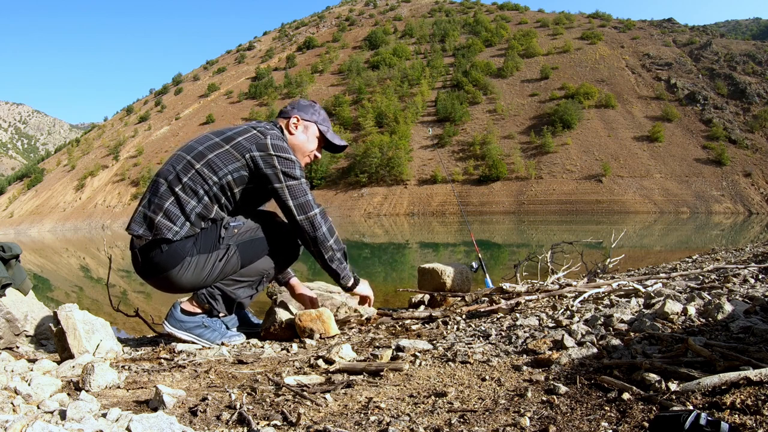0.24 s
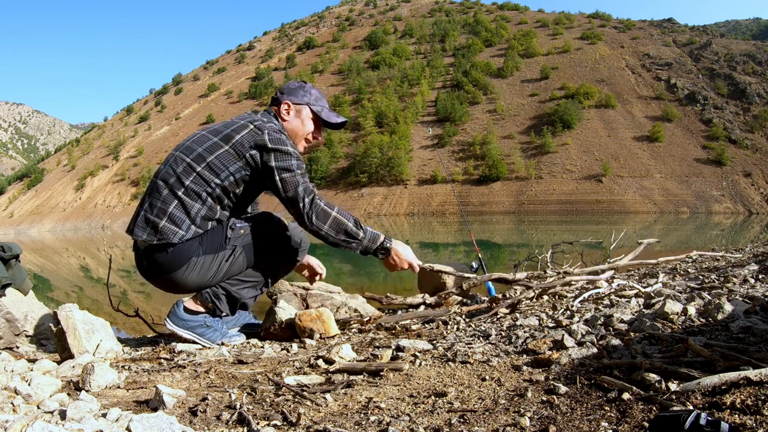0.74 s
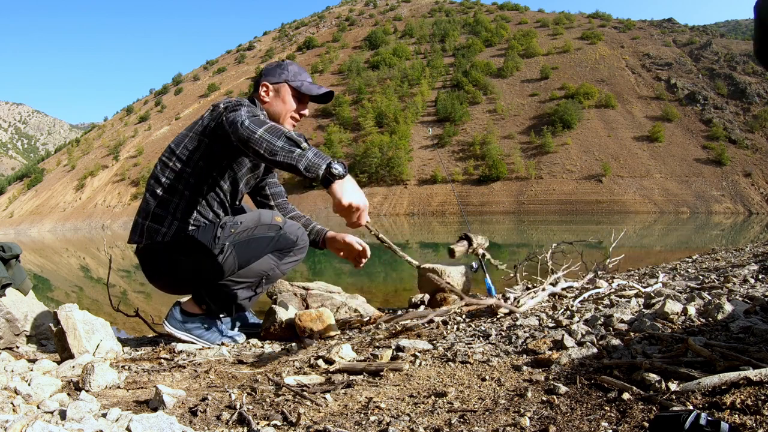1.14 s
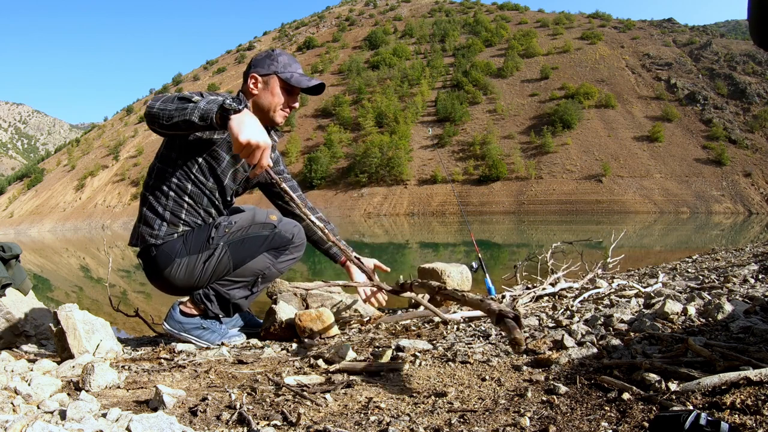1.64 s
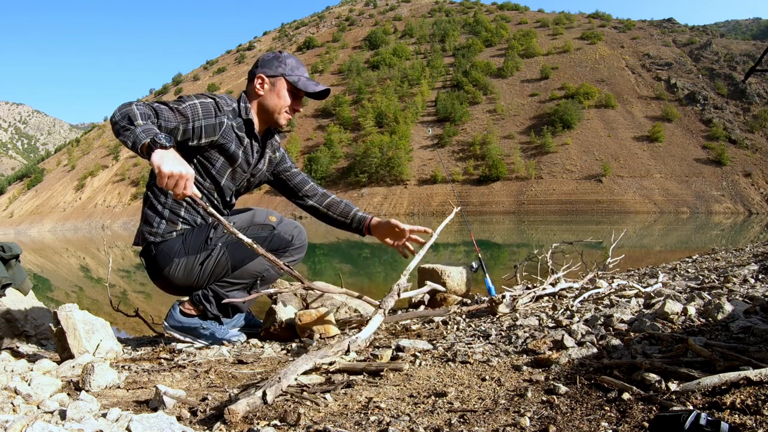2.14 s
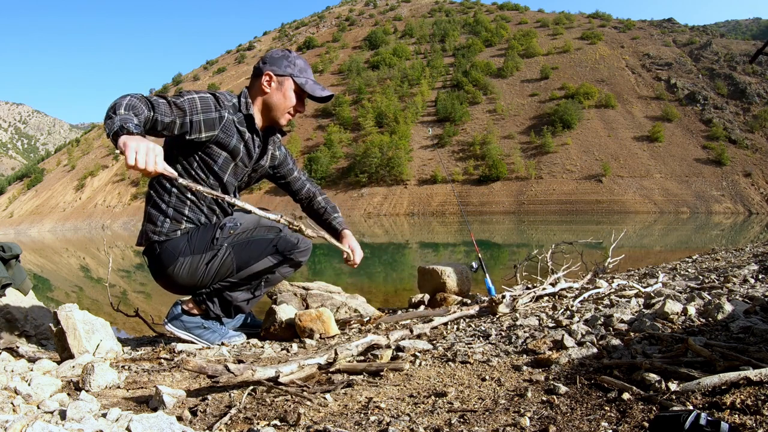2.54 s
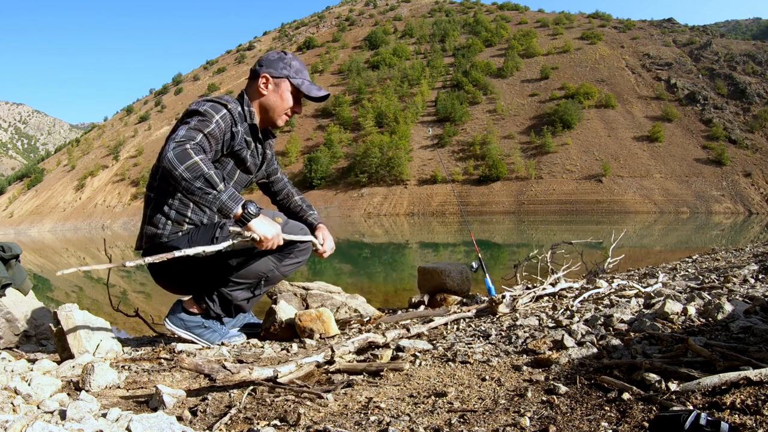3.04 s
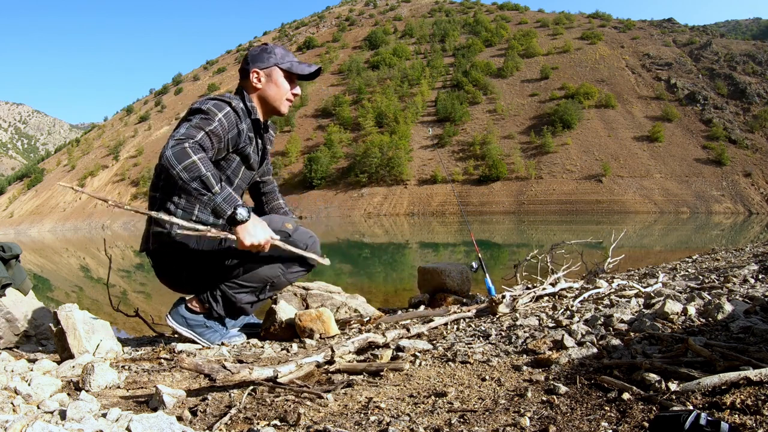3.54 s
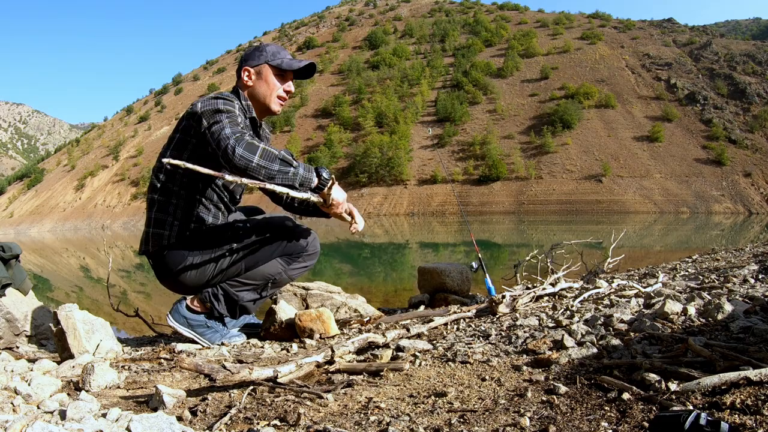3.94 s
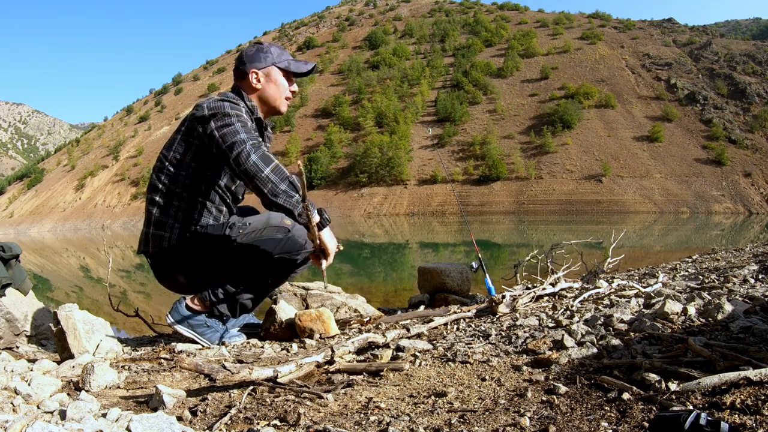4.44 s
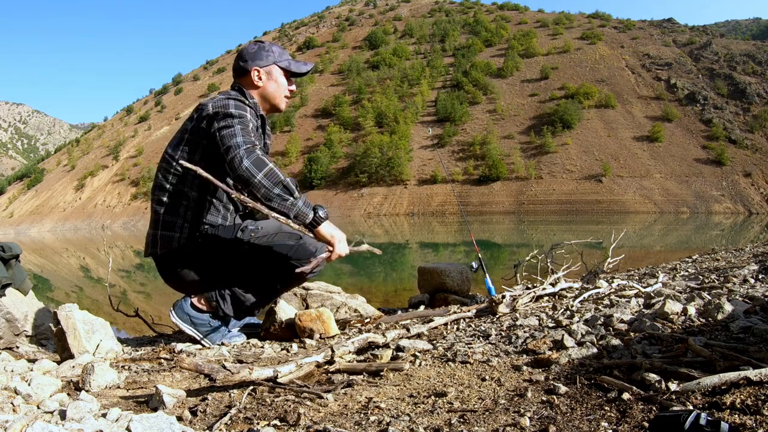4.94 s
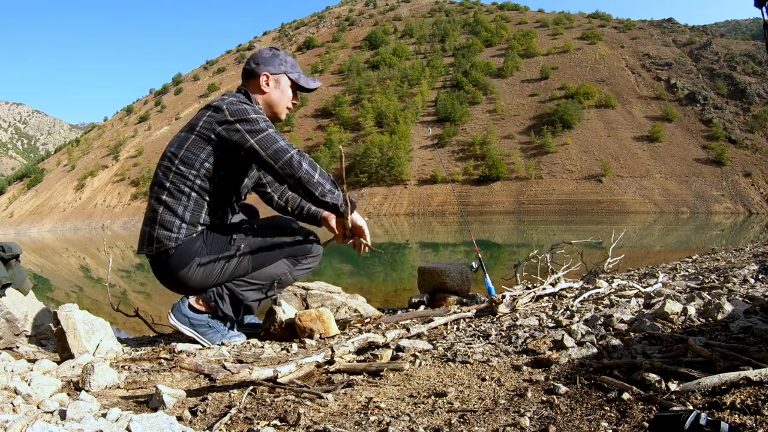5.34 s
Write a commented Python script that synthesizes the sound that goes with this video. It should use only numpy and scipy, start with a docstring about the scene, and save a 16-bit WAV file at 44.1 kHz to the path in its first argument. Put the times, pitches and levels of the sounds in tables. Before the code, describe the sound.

Brittle branches clatter and scrape across stones, rustle in the hands, and break in a few loud snaps over faint outdoor hush.

```python
"""Dry sticks are pulled from a pile, dragged over gravel and snapped by hand on a quiet stony shore.
Light knocks open the scene over a faint wash of filtered noise; dense cracking, rustle and drag follow.
The sharpest snaps come near 3.6, 3.9 and 4.8 s, each a short noise burst ringing damped modes.
A soft rising scrape of resonant friction noise follows the last of them, then handling rustle, which is
grainy noise shaped by a spectrum, as is the drag; lesser cracks continue through it."""
import sys
import numpy as np
from scipy import signal
from scipy.fft import rfft, irfft, next_fast_len
from scipy.io import wavfile
from scipy.ndimage import uniform_filter1d

SR = 44100
rng = np.random.default_rng(int(sys.argv[2]) if len(sys.argv) > 2 else 0)


def transcribe(u):
    """Save the signal u as a 16-bit wav file named by the first command-line argument.

    u: samples, shape (n,) or (channels, n), limited to [-1, 1]; the rate is SR.
    q: integer samples, one column per channel.
    """
    v = np.clip(np.atleast_2d(u).T, -1, 1)
    q = np.round(v * 32767).astype(np.int16)
    wavfile.write(sys.argv[1], SR, q)


N = 246739  # length [samples]


def gain_of(db):
    """Decibel definition: 20 dB is a tenfold amplitude."""
    return 10 ** (np.asarray(db) / 20)


def evened(x):
    """Normalisation to unit root-mean-square amplitude."""
    return x / np.sqrt(np.mean(x ** 2) + 1e-20)


def peaked(x):
    """Normalisation to a unit peak of the Hilbert envelope."""
    return x / (abs(signal.hilbert(x)).max() + 1e-12)


def read(points, hz):
    """Interpolation of a frequency table on a logarithmic frequency axis."""
    f, value = np.transpose(points)
    return np.interp(np.log(hz + 1), np.log(f + 1), value)


def follow(points, t):
    """Linear interpolation of a time table."""
    return np.interp(t, *np.transpose(points))


def add(mix, s, sound):
    """Superposition: a sound starting at s seconds sums into the mix."""
    part = mix[:, round(s * SR):][:, :sound.shape[1]]
    part += sound[:, :part.shape[1]]


def ring(x, hz, width):
    """Resonance: one damped mode of the given bandwidth [Hz], driven by x."""
    pole = np.exp((2j * np.pi * hz - np.pi * width) / SR)
    return signal.lfilter([1], [1, -pole], x).imag


# Interaural likeness of spread-out sounds: (frequency [Hz], left-right correlation [-1 to 1])
LIKENESS = [(60, -0.31), (130, -0.36), (290, 0.14), (640, -0.51), (1410, -0.66), (3100, 0.91), (6820, 0.79),
            (15000, 0.81)]
# Frequency dependence of the level difference: (frequency [Hz], share of the left-right dB [ratio])
SHADOW = [(250, 0.), (700, 0.4), (1400, 1.25), (2600, 0.77), (4500, -0.7), (9000, 1)]


def spread(x, colour, patchy_db, balance_db, size, focus=0, bright_points=((0, 0), (1, 0)), bright_scale=1):
    """Partial coherence: two coloured noises blend into a partly alike left and right, in drifting patches."""
    overlap = size * 3 // 4
    hz, t, (a, b) = signal.stft(x, SR, nperseg=size, noverlap=overlap)
    # patches are smoothed in frequency, then in time
    patches = uniform_filter1d(rng.standard_normal(a.shape), size=size // 56, axis=0)
    patches = evened(uniform_filter1d(patches, size=7200 // size, axis=1))
    same = np.clip(focus + (1 - focus) * read(LIKENESS, hz), -1, 1)[:, None]
    side = gain_of(balance_db * read(SHADOW, hz)[:, None] / 2)
    # the spectral tilt pivots at 5200 Hz
    tilt_shape = np.tanh(np.log(hz + 1) - np.log(5200))[:, None]
    tilt_db = tilt_shape * bright_scale * follow(bright_points, t)
    left = a * side
    right = (same * a + np.sqrt(1 - same ** 2) * b) / side
    colour_db = read(colour, hz)[:, None] + patchy_db * patches + tilt_db
    z = np.array([left, right]) * gain_of(colour_db)
    return evened(signal.istft(z, SR, nperseg=size, noverlap=overlap)[1][:, :N])


def grit(grain_db, grain_size):
    """Granular contact: noise strength jumps from grain to grain [samples], a few grains being large."""
    draws = np.minimum(rng.exponential(1, N // grain_size + 1), 3.5)
    sizes = gain_of(grain_db * np.repeat(draws, grain_size)[:N])
    sizes /= np.sqrt(uniform_filter1d(sizes ** 2, size=6000))  # keeps the local power steady
    return sizes * rng.standard_normal((2, N))


# Spectrum of the background wash: (frequency [Hz], relative spectral level [dB])
AIR_COLOUR = [(15, -44), (25, -2.5), (87, -19), (170, -4.5), (575, -13.5), (818, -4), (1440, -15.5),
              (2050, -16.5), (2760, -24), (3620, -18.5), (3920, -22), (8140, -27), (12900, -39),
              (16000, -45)]
AIR_DB = -66  # RMS level


def air():
    """Broadband noise: the faint steady wash of the open shore and the microphone."""
    noise = rng.standard_normal((2, N))
    return gain_of(AIR_DB) * spread(noise, AIR_COLOUR, patchy_db=3.7, balance_db=-0.4, size=2048)


# Spectrum of wood on stones: (frequency [Hz], relative spectral level [dB])
DRAG_COLOUR = [(35, -81), (60, -33.5), (112, -34), (155, 3.5), (198, 0), (275, -7), (388, -3.5), (759, -3),
               (1220, -2.5), (3000, -10), (3900, -44), (6600, -120)]


def drag(gain):
    """Impact excitation: wood bumps over stones in coarse, low grains, focused and leaning to the right."""
    bumps = grit(2.82, grain_size=220)
    return gain * spread(bumps, DRAG_COLOUR, patchy_db=4.0, balance_db=-3.0, size=1024, focus=0.78)


# Spectrum of cloth and skin on bark: (frequency [Hz], relative spectral level [dB])
RUSTLE_COLOUR = [(1350, -40), (2300, -10), (2730, -9), (2960, -4), (3510, 0), (4970, -8), (6710, -1),
                 (8030, -10), (9600, -8), (11800, -20), (13700, -20), (16000, -41)]
# Treble tilt of the rustle before its 1.5-fold scaling: (time [s], tilt [dB])
RUSTLE_TILT = [(0, 2.5), (0.95, 2.5), (1.55, 3), (1.68, -6), (1.85, 3.5), (2.0, -3.5), (2.35, -3),
               (2.75, -8), (3.0, -2), (3.57, 1), (3.95, -3), (4.2, 2), (4.8, -4), (5.3, -2.5), (5.6, 0.5)]


def rustle(gain):
    """Sliding friction: cloth and skin on bark give fine hiss with small catches."""
    catches = grit(2.07, grain_size=50)
    return gain * spread(catches, RUSTLE_COLOUR, patchy_db=3.5, balance_db=-0.5, size=512,
                         bright_points=RUSTLE_TILT, bright_scale=1.5)


# Hand and branch movements, levels at mid-stroke before smoothing:
# (start [s], length [s], rustle level [dB], drag level [dB], swell from start to end [dB])
STROKES = [(0.103, 0.085, -62, -62.5, 17), (0.176, 0.12, -74.5, -66, -2), (0.561, 0.33, -63.5, -65, 15),
           (0.892, 0.036, -51.5, -55, -4), (0.953, 0.21, -58, -61.5, -0.5), (1.175, 0.09, -81, -69.5, -1),
           (1.258, 0.043, -54.5, -49, -8), (1.306, 0.089, -45.5, -47.5, -15),
           (1.398, 0.035, -48, -47.5, -12), (1.44, 0.174, -53.5, -54, -7), (1.621, 0.13, -54.5, -55, -9),
           (1.763, 0.23, -73, -65, 5), (1.944, 0.057, -46, -43.5, -3), (2.004, 0.1, -59.5, -52.5, -9),
           (2.107, 0.28, -68, -61.5, -4.5), (2.21, 0.04, -57.5, -54, -5), (2.415, 0.084, -60, -56, -24),
           (2.5, 0.096, -59.5, -59, -10), (2.613, 0.072, -61, -63, -5), (2.688, 0.05, -76, -64, -2),
           (2.749, 0.049, -64.5, -75.5, -2), (2.877, 0.139, -95, -67, 11), (2.937, 0.19, -60, -74, -0.5),
           (3.3, 0.12, -62.5, -74, 4), (3.439, 0.032, -70, -87, -2), (3.589, 0.2, -62, -70, -15.5),
           (3.878, 0.011, -47, -55, 12), (3.902, 0.095, -63.5, -73, -18), (3.985, 0.031, -54, -62, -20),
           (4.021, 0.118, -54, -83, 8), (4.145, 0.081, -52.5, -75.5, -8), (4.241, 0.14, -64, -73, -8),
           (4.807, 0.055, -50.5, -59, -9), (4.846, 0.15, -57, -60.5, -20.5), (5.043, 0.075, -58, -72, 6.5),
           (5.124, 0.076, -61.5, -74, 8), (5.211, 0.125, -57, -67, -6), (5.369, 0.23, -50.5, -65.5, 12)]
# Loose bark and grit: initial level is an offset plus shares of the crack's levels, then decays
BARK_SHARE, BARK_SPLINTER_SHARE, BARK_DB, BARK_T60_S = 0.62, 0.25, -28.5, 0.059
GRIT_SHARE, GRIT_DB, GRIT_T60_S = 0.81, -19.5, 0.068
SETTLE_S = 0.0051  # time constant


def movements():
    """Addition of power: rustle and drag strength from every stroke and from debris after listed cracks."""
    power = np.zeros((2, N))
    for start, length, rustle_db, drag_db, swell_db in STROKES:
        u = np.linspace(-.5, .5, round(length * SR))
        add(power, start, gain_of([[rustle_db], [drag_db]] + swell_db * u) ** 2)
    t = np.arange(SR // 4) / SR
    for s, peak_db, _, treble_db, knock_db, _ in CRACKS:
        bark_db = BARK_DB + BARK_SHARE * peak_db + BARK_SPLINTER_SHARE * treble_db - 60 * t / BARK_T60_S
        grit_db = GRIT_DB + GRIT_SHARE * (peak_db + knock_db) - 60 * t / GRIT_T60_S
        add(power, s, gain_of([bark_db, grit_db]) ** 2)
    strength = uniform_filter1d(np.sqrt(power), size=250)
    settle = np.exp(-1 / (SETTLE_S * SR))  # loose bits keep moving for a moment
    return signal.lfilter([1 - settle], [1, -settle], strength)


# The freed end rubs along the stick, level before scatter and microphone response:
# (start [s], end [s], pitch at start [Hz], pitch at end [Hz], level [dB])
SCRAPE = (4.885, 4.955, 385, 440, -55)


def scrape(start, end, hz, end_hz, level_db):
    """Friction-driven resonance: noise rings one low mode, rising as the free length shortens."""
    count = round((end - start) * SR)
    wobble = ring(rng.standard_normal((2, count)), 30, 60)
    turn = np.exp(2j * np.pi * np.cumsum(np.linspace(hz, end_hz, count)) / SR)
    tone = evened((turn * (wobble[0] + 1j * wobble[1])).real)
    return gain_of(level_db) * np.array([tone, tone]) * np.hanning(count)


def stones(x):
    """Scattering: nearby stones return sparse quick echoes, different on each side."""
    ms = np.arange(1800) * 1000 / SR
    taps = rng.standard_normal((2, len(ms))) * (rng.random((2, len(ms))) < .1)
    taps *= gain_of(-2.2 * ms) * (ms > .3)
    taps /= np.linalg.norm(taps, axis=1, keepdims=True)
    return signal.oaconvolve(x, taps, axes=1)[:, :N]


# Response to sharp sounds: (frequency [Hz], gain [dB])
MICROPHONE = [(60, -37), (110, -37), (150, -4.5), (1000, -2), (2000, -3), (3500, 4.5), (10000, 7),
              (12000, -5), (16000, -12.5)]


def microphone(x):
    """Linear filtering: the frequency response multiplies the spectrum of the sharp sounds."""
    size = next_fast_len(N)
    response = gain_of(read(MICROPHONE, np.fft.rfftfreq(size, 1 / SR)))
    return irfft(rfft(x, size) * response, size)[:, :N]


# Random small twigs: level above the motion, its random spread, pitch range, treble and knock
TWIG_DB, TWIG_SPREAD_DB, TWIG_LOW_HZ, TWIG_HIGH_HZ = 8.5, 2, 2267, 7100
TWIG_TREBLE_DB, TWIG_KNOCK_DB, TWIG_KNOCK_HZ = -9.5, -11, 658  # lowest knock pitch; the highest is an octave up


def twigs(motion, count):
    """Random point process: rows for small cracks, whose levels follow the motion at their moment."""
    when, size, pitch, wood = rng.random((count, 4)).T
    motion_db = 20 * np.log10(abs(motion[(when * N).astype(int)]) + 1e-9)
    level_db = motion_db + TWIG_DB + TWIG_SPREAD_DB * np.minimum(-np.log(1 - size), 2)
    hz = TWIG_LOW_HZ * (TWIG_HIGH_HZ / TWIG_LOW_HZ) ** pitch
    return [(w * N / SR, db, f, TWIG_TREBLE_DB, TWIG_KNOCK_DB, TWIG_KNOCK_HZ * (1 + k))
            for w, db, f, k in zip(when, level_db, hz, wood)]


# Difference of a crack between the microphones: (frequency [Hz], relative level [dB])
SIDEWAYS = [(150, -25.5), (1000, -11), (3000, -23), (6000, -6), (10000, -4)]
TEAR_MS = 0.72  # time constant of the burst
THIN_BELOW_HZ = 288


def crack(peak_db, twig_hz, treble_db, knock_db, knock_hz, pan_db):
    """Impulsive modal excitation: parting fibres click unevenly and ring twig, splinters and thick wood."""
    ms = np.arange(1024) * 1000 / SR
    u = ms / TEAR_MS
    clicks_db = 5.8 * rng.exponential(1, len(ms) // 16).clip(0, 3).repeat(16)
    fibres = rng.standard_normal((3, len(ms))) * gain_of(clicks_db)
    fibres *= u ** 1.09 * np.exp(-u)
    pitched = peaked(ring(ring(fibres[0], twig_hz, 0.18 * twig_hz), twig_hz, 1.0 * twig_hz))
    broad = peaked(ring(ring(fibres[1], 5800, 7900), 4530, 3930))
    splinters = peaked(ring(ring(fibres[1], 7240, 6900), 7240, 6900))
    knock = peaked(ring(ring(fibres[2], knock_hz, 0.34 * knock_hz), knock_hz, 530))
    # a splintering break is wide, a tap is pitched
    twig = peaked(pitched + gain_of(0.35 * treble_db - 0.5) * broad)
    hz = np.fft.rfftfreq(len(ms), 1 / SR)
    thin = (1j * hz / (1j * hz + THIN_BELOW_HZ)) ** 2  # thin wood sends out little bass
    thin_wood = thin * rfft(twig + gain_of(treble_db) * splinters)
    sound = gain_of(peak_db) * (thin_wood + gain_of(knock_db) * rfft(knock))
    # the body around the microphones bends the sound differently to each, fading 40 dB per ms
    bend = rng.standard_normal(len(ms)) * gain_of(-40 * ms)
    differs = rfft(bend / np.linalg.norm(bend)) * gain_of(read(SIDEWAYS, hz))
    side = gain_of(pan_db * read(SHADOW, hz) / 2)
    return irfft(sound * np.array([side * (1 + differs), (1 - differs) / side]))


# Cracks and knocks, levels before filtering; treble and knock are relative to the twig:
# (time [s], twig level [dB], twig pitch [Hz], splinter treble [dB], knock level [dB], knock pitch [Hz])
CRACKS = [(0.004, -46, 2280, -14, -4, 820), (0.105, -53.5, 7300, -13, -23, 756),
          (0.1522, -45.5, 3840, 0, 3, 1320), (0.2443, -51, 3240, -4.5, -5, 845),
          (0.3043, -63, 3010, -8, 16, 816), (0.3202, -47, 2750, -14, 10.5, 815),
          (0.6262, -44.5, 2160, -20, -3, 1140), (0.807, -42, 3160, 4.5, -1, 800),
          (0.814, -42, 3030, -21, 2.5, 714), (0.8592, -45.5, 2780, -5, 5, 567),
          (0.9408, -35, 5860, -20, -20, 1100), (0.9774, -38, 5770, -34, -23, 1020),
          (0.984, -35.5, 5360, -5.5, -23, 643), (1.015, -34, 2960, 4, -2.5, 1420),
          (1.1442, -45, 5200, -4, -12, 1360), (1.2047, -46, 4670, -2, -19, 856),
          (1.255, -18.5, 1800, -12.5, -1, 940), (1.296, -22, 2010, -31, -9, 1010),
          (1.3138, -31.5, 1550, -7, 10, 880), (1.3329, -26.5, 3250, -2, -4, 330),
          (1.4001, -29.5, 3080, -1.5, 7, 713), (1.444, -33.5, 7500, -29, -13, 318),
          (1.458, -35, 2280, -5, -7, 950), (1.5352, -33, 2460, 0, -5.5, 890),
          (1.571, -42.5, 5770, -8, 2.5, 490), (1.6384, -41.5, 3400, 9, 0, 875),
          (1.6514, -37, 3530, -14, 5, 760), (1.674, -33, 1690, -34, -26, 1340),
          (1.71, -37, 3600, -5, 0, 1290), (1.7994, -48, 3380, -7, -8, 830),
          (1.8387, -46.5, 2030, -44, -9, 1460), (1.94, -38.5, 3080, 0, -31, 638),
          (1.958, -24, 3900, -30, -19, 1000), (2.0471, -51, 3450, -15, 15.5, 490),
          (2.187, -32.5, 2670, -38, -36, 1120), (2.2215, -45, 3590, -13, -6, 1260),
          (2.247, -40, 3280, -27, -29, 783), (2.289, -51, 4300, -24, -22, 1200),
          (2.3057, -36, 2670, -45, -17, 1010), (2.3397, -29, 2670, -29, -35, 915),
          (2.3683, -44, 2650, -19, -27, 1230), (2.427, -25.5, 1450, -37, -0.5, 1390),
          (2.432, -20, 2720, -25, -4.5, 1500), (2.4872, -46.5, 4170, -16, 1, 304),
          (2.5143, -37, 1650, -21, -12, 750), (2.5448, -20, 2510, -31.5, -44, 1500),
          (2.5621, -29.5, 2340, -40, -36, 1050), (2.5764, -39.5, 2750, -38, -25, 875),
          (2.597, -34.5, 3030, -51, -7, 1200), (2.6975, -40, 2350, -35, -5.5, 1200),
          (2.7539, -44.5, 1600, -19, -21, 1500), (2.9084, -70, 1520, -23, 22.5, 340),
          (2.9733, -44, 1680, -36, -7, 725), (3.0569, -48.5, 3840, 0, -4, 367),
          (3.0869, -36, 1590, -46, -3.5, 1510), (3.549, -45, 3500, -7.5, -27.5, 350),
          (3.56, -41, 3420, 6, -7, 590), (3.571, -8, 4460, -13, -28, 760),
          (3.6366, -42, 6760, 2.5, -19, 730), (3.6466, -42, 4100, 1, -24, 730),
          (3.6558, -41, 4450, -16, -17, 355), (3.6684, -43, 6300, -9, -31, 361),
          (3.768, -57, 1310, -26, 7.5, 1320), (3.8899, -26.5, 1520, -13, -28, 1410),
          (3.893, -15, 2287, -8, -24, 1400), (3.9906, -37, 3500, -5, -2, 776),
          (4.04, -37, 3680, -25, -40, 764), (4.1078, -38, 3870, -4, -42.5, 800),
          (4.2227, -45, 4970, -19, -38, 830), (4.2543, -43, 3660, -17, -40, 762),
          (4.311, -47.5, 4500, 1, -30, 800), (4.3473, -43, 2700, -7, -29, 627),
          (4.3933, -51.5, 4860, -4, -21, 876), (4.436, -53.5, 4700, -7, -22, 837),
          (4.5002, -52, 3130, -26, -36.5, 854), (4.548, -53.5, 5000, -19, -33, 713),
          (4.641, -49.5, 3690, -14, -21, 705), (4.761, -48.5, 5730, 1, -12, 891),
          (4.784, -38.5, 2500, -4, -4, 900), (4.7943, -8, 3090, -4.5, -18, 970),
          (4.825, -43, 4500, -6, -11, 900), (4.835, -35, 3520, -16, -9, 1350),
          (4.849, -44, 3830, -5, -24, 900), (4.9624, -56.5, 2760, -35, 12.5, 1270),
          (5.2157, -43.5, 3930, -4.5, -8, 298), (5.264, -45, 3590, -9, -2, 740),
          (5.3132, -40.5, 2980, -32, -0.5, 810), (5.35, -43.5, 3630, -12, -5.5, 754),
          (5.4044, -39.5, 3350, -24, -14, 1400)]
# Where the wood is handled, before weighting by SHADOW: (time [s], left-right level difference [dB])
PLACE = [(0, -1), (0.9, -9), (1.15, 1.5), (1.3, -6), (1.95, 2), (2.3, -9), (2.45, -1.5), (2.55, -5.5),
         (3.1, -11.5), (3.57, -2), (4.4, 0.5), (4.8, -3), (5.0, 0.5), (5.6, 1)]


def scene():
    """Superposition: cracks and scrape with their scatter over rustle, drag and air."""
    rustle_gain, drag_gain = movements()
    motion = np.sqrt(abs(rustle_gain * drag_gain))
    sharp = np.zeros((2, N))
    for s, *row in CRACKS + twigs(motion, count=130):
        add(sharp, s, crack(*row, follow(PLACE, s)))
    add(sharp, SCRAPE[0], scrape(*SCRAPE))
    sharp += gain_of(-5) * stones(sharp)
    return microphone(sharp) + rustle(rustle_gain) + drag(drag_gain) + air()


EDGE_HZ = 16100


def record(dry):
    """Band limitation: a linear-phase low-pass filter removes the highest treble."""
    lowpass = signal.firwin(511, EDGE_HZ, window=("kaiser", 9), fs=SR)
    return signal.oaconvolve(dry, lowpass[None], "same")


dry = scene()
out = record(dry)
transcribe(out)
```